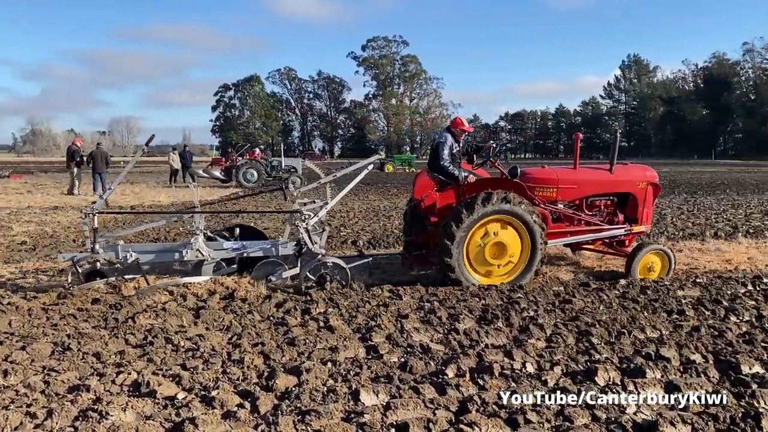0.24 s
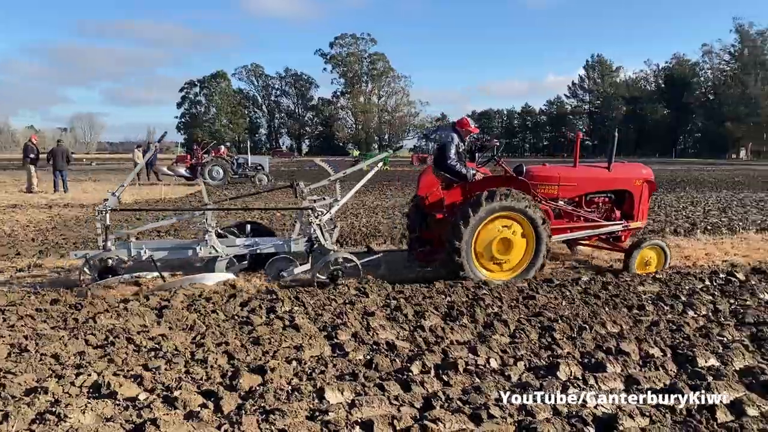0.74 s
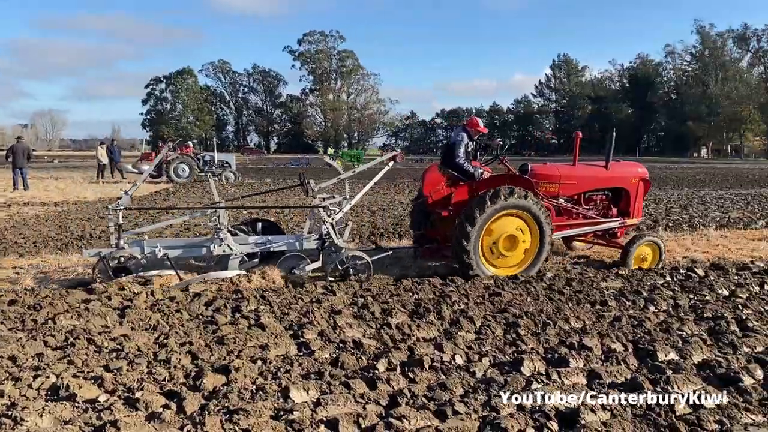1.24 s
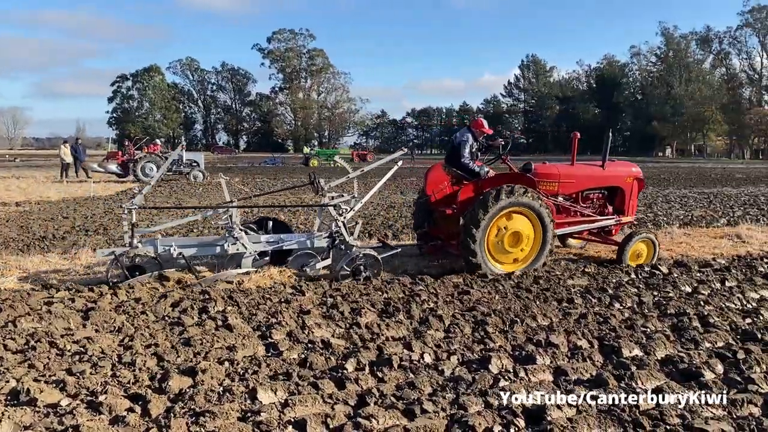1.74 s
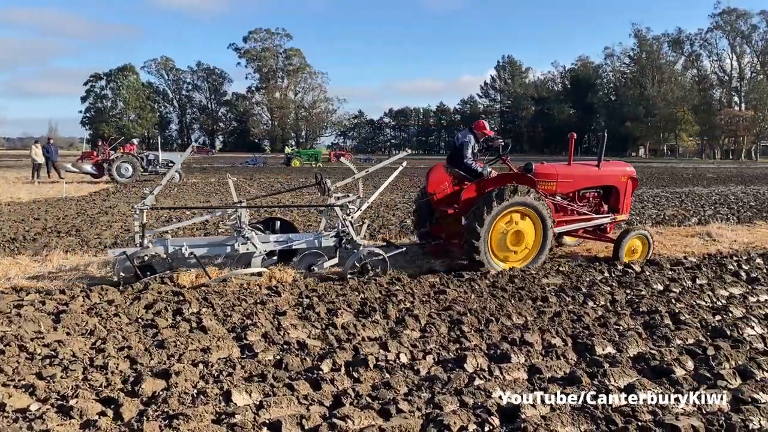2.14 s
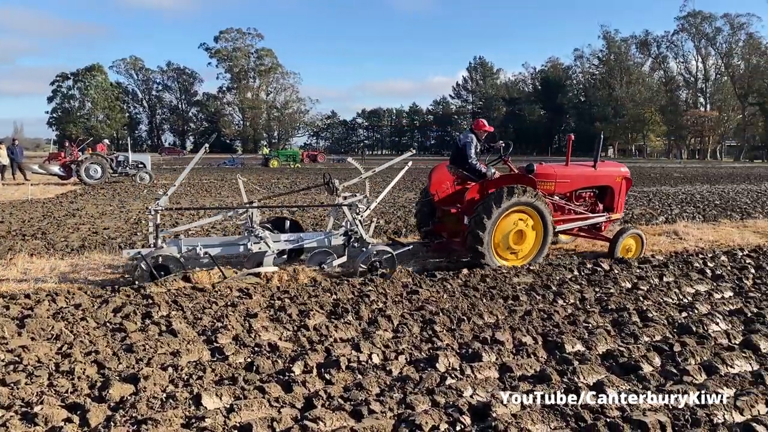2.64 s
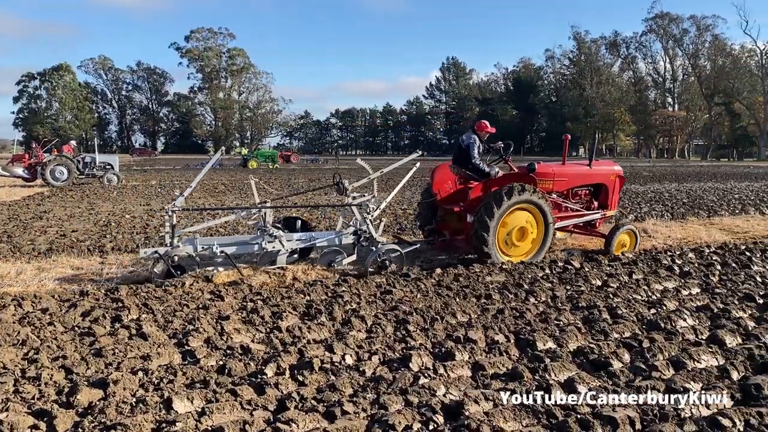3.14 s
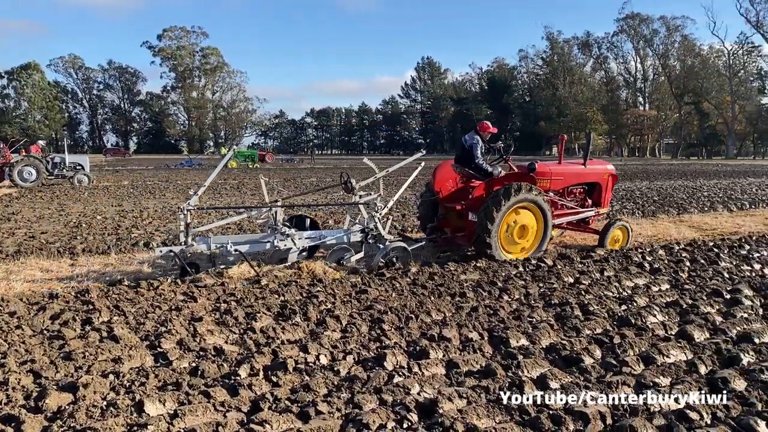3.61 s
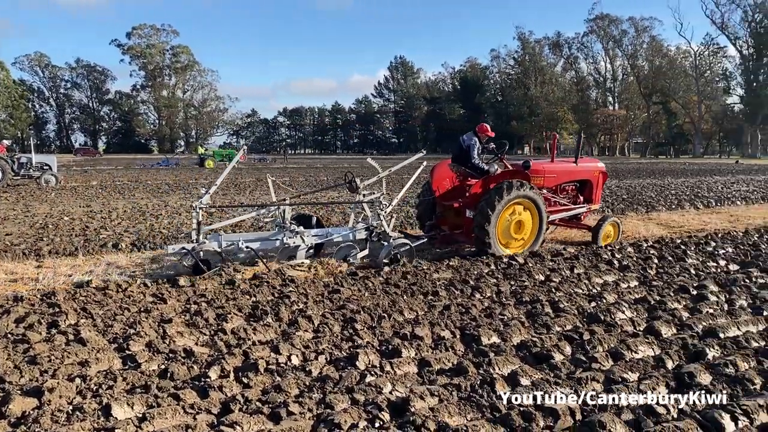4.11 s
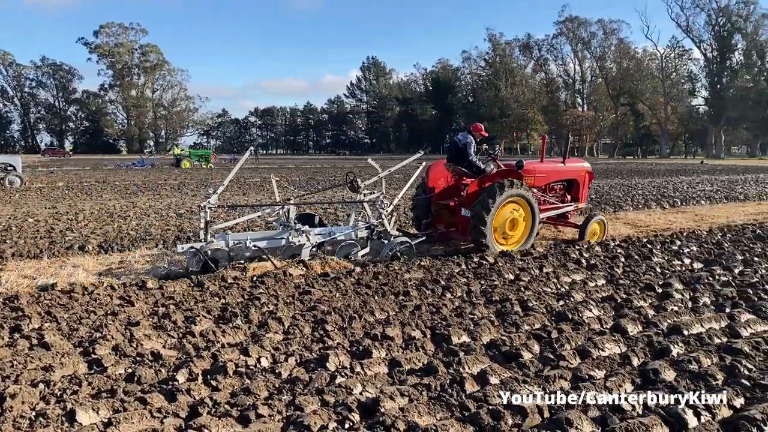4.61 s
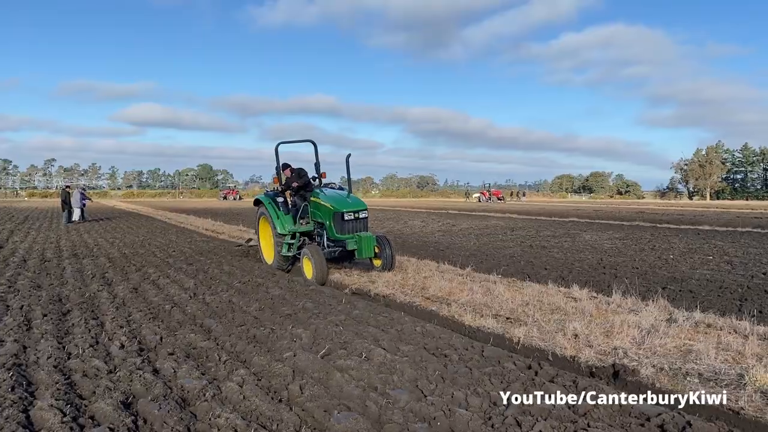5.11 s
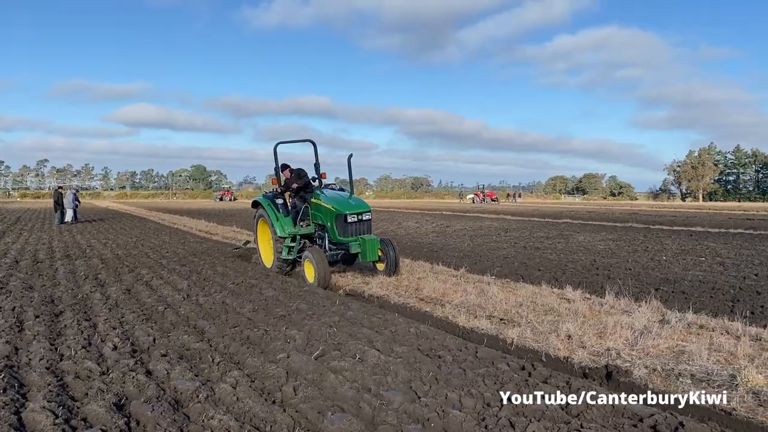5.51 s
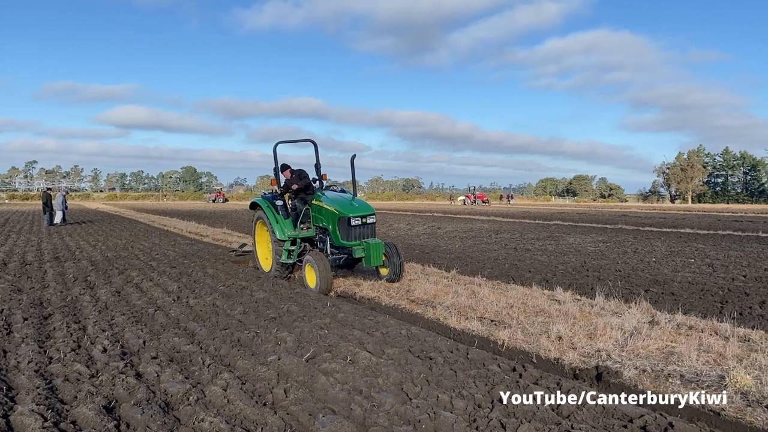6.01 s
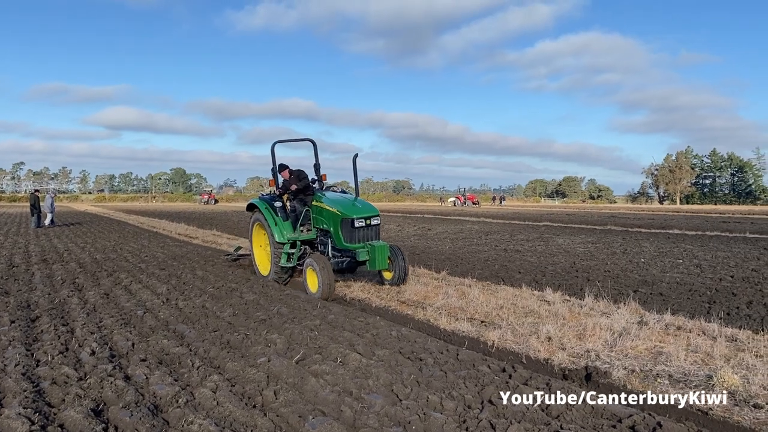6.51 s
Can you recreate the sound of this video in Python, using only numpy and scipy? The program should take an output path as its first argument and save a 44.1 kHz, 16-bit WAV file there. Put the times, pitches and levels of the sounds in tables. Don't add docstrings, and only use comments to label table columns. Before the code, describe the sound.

An old tractor chuffs and clanks rapidly over a deep boom in buffeting wind, then cuts to a smaller diesel's steady tight clatter.

```python
import sys
import numpy as np
from scipy import signal
from scipy.fft import rfft, irfft
from scipy.io import wavfile
from scipy.ndimage import uniform_filter1d

SR = 44100
rng = np.random.default_rng(int(sys.argv[2]) if len(sys.argv) > 2 else 0)


def undo_db(level):
    steps = np.asarray(level, float) / 20
    return 10 ** steps


def generate_wav(sig):
    pcm = np.round(np.clip(np.atleast_2d(sig).T, -1, 1) * 32767).astype(np.int16)
    wavfile.write(sys.argv[1], SR, pcm)


N = 297675
T = np.arange(N) / SR
HZ = np.fft.rfftfreq(N, 1 / SR)
CUT_S = 4.915


def curve(table):
    s, *columns = np.transpose(table)
    return [np.interp(T, s, c) for c in columns]


def unit(x):
    return x / np.sqrt(np.mean(x ** 2))


def walk(rate_hz):
    hold = int(SR / rate_hz)
    steps = np.repeat(rng.standard_normal(N // hold + 1), hold)
    return unit(uniform_filter1d(uniform_filter1d(steps, hold), hold)[:N])


def colour(x, spectrum, rings=()):
    hz, db = np.transpose(spectrum)
    gain_db = np.interp(np.log(HZ + 1), np.log(hz), db)
    for ring_hz, width_hz, ring_db in rings:
        gain_db = gain_db + ring_db / (1 + (2 * (HZ - ring_hz) / width_hz) ** 2)
    return irfft(rfft(x) * undo_db(gain_db), N)


def patchy(spectrum, rings, flicker_db):
    hiss = rfft(colour(rng.standard_normal((2, N)), spectrum, rings))
    out = 0
    for octave in (8, 9.5, 11, 12.5, 14):
        band = np.clip(1 - abs(np.log2(HZ + 1) - octave) / 1.5, 0, 1)
        out = out + irfft(hiss * band, N) * undo_db(flicker_db * walk(12))
    return unit(out)


def ports(pair, table):
    hz, *columns = np.transpose(table)
    lead, lean_db, apart_db = (np.interp(HZ, hz, c) for c in columns)
    side = np.array([[1], [-1]])
    same, apart = rfft(pair)
    both = same * np.exp(.5j * side * lead) + side * apart * undo_db(apart_db)
    return irfft(both * undo_db(side * lean_db / 2), N)


def beat(place, rise, fall):
    p = place % 1
    return (1 - np.exp(-p / rise)) ** 2 * np.exp(-p / fall)


def ring(struck, hz, t60):
    keep, turn = np.exp(-np.log(1000) / (t60 * SR)), 2 * np.pi * hz / SR
    return signal.lfilter([np.sin(turn)], [1, -2 * keep * np.cos(turn), keep ** 2], struck)


# start_s, peak_db, swing_hz, crackle_db (over the swing)
STRONG_EDDIES = [(.054, -15, 150, -9), (.398, -14, 167, -12), (.488, -11, 179, -26), (.54, -10, 151, -30),
                 (.59, -9, 197, -24), (.953, -8, 170, -7), (1.06, -17.5, 211, -10), (1.139, -12, 139, -22),
                 (1.26, -6, 132, -24), (1.35, -12.5, 207, -15), (1.682, -13.5, 221, -20),
                 (1.781, -2, 193, -17.5), (2.312, -15, 235, -15), (2.618, -16, 203, -20),
                 (2.828, -15, 169, -20), (3.051, -14.5, 130, -22), (3.306, -7, 202, -13.5),
                 (3.375, -9.5, 260, -7), (3.443, -8, 168, -6), (3.517, -10.5, 191, -7),
                 (3.736, -13, 200, -4), (3.914, -16, 185, -24), (3.97, -19, 220, 0),
                 (4.274, -17.5, 241, -12), (4.315, -14.5, 166, -12), (4.358, -7, 147, -11),
                 (4.401, -5, 208, -10), (4.696, -7.5, 165, -9.5), (4.843, -17, 215, 1),
                 (4.89, -11.5, 240, -4)]
# start_s, peak_db, swing_hz
LATE_EDDIES = [(5.167, -20.5, 176), (5.26, -23, 148), (5.445, -20, 132), (5.491, -22, 183),
               (5.601, -16, 252), (5.747, -30, 137), (6.126, -18.5, 140), (6.158, -11.5, 132),
               (6.215, -24, 143), (6.274, -20, 221), (6.377, -14, 200), (6.502, -18, 260),
               (6.655, -20, 260), (6.707, -17, 258)]
# start_s, peak_db, swing_hz
SMALL_EDDIES = [(.31, -21, 200), (0.637, -21, 200), (.746, -23, 200), (0.815, -28, 226), (.925, -20, 150),
                (1.09, -21, 204), (1.2, -14, 150), (1.287, -16, 230), (1.38, -36, 200), (1.528, -30, 200),
                (1.841, -18, 200), (1.869, -17.5, 306), (2.016, -22, 190), (2.112, -18, 287),
                (2.25, -20, 199), (2.471, -33, 196.5), (2.689, -22, 200), (2.782, -24, 200),
                (2.852, -19, 200), (2.977, -20, 199), (3.153, -20, 200), (3.54, -20, 260),
                (3.57, -17.5, 240), (3.647, -27, 200), (3.713, -30, 310), (3.75, -16, 200),
                (3.837, -19, 150), (3.93, -21, 200), (4.004, -34, 258), (4.036, -21, 275),
                (4.061, -31, 288), (4.108, -24, 186), (4.13, -18.5, 130), (4.235, -17.5, 140),
                (4.464, -17, 175), (4.507, -34, 200), (4.606, -25, 200), (4.65, -22, 160),
                (4.935, -22, 170), (5.03, -24, 200), (5.129, -35, 170), (5.231, -25, 200),
                (5.282, -25, 330), (5.38, -29, 330), (5.53, -24, 300), (5.662, -21, 170), (5.786, -27, 170),
                (5.813, -27, 170), (6.238, -22, 300), (6.287, -20, 160), (6.311, -22, 170),
                (6.625, -21, 130), (6.41, -27, 170)]


def eddies():
    late = [(*row, -3) for row in LATE_EDDIES]
    small = [(*row, -9) for row in SMALL_EDDIES]
    return [*STRONG_EDDIES, *late, *small]


# freq_hz, level_db (per Hz)
GUST_COLOUR = [(25, -38), (45, -0.5), (75, -2), (130, -4.5), (250, -9), (400, -20.5), (700, -24),
               (1200, -59), (3000, -110)]


def gusts(gust_db, bursts, alike=0.59):
    shared, *own = (undo_db(2.2 * walk(40)) * rng.standard_normal(N) for _ in range(3))
    wake_db, wake_s = -20, .022
    wake = sum(undo_db(db + wake_db) * np.exp(-((T - s) / wake_s) ** 2) for s, db, *_ in bursts)
    strength = undo_db(gust_db + .8 * walk(7.4)) + wake
    return strength * unit(colour(alike * shared + (1 - alike) * np.array(own), GUST_COLOUR))


def wind(gust_db):
    bursts = eddies()
    out = gusts(gust_db, bursts)
    rough = rng.standard_normal((2, N)) + 1.08 * rng.standard_normal(N)
    rough = unit(colour(rough, [(200, -40), (330, 2.5), (500, -6.0), (750, -12.0), (1300, -36), (3000, -90)]))
    snap_hz, snap_s, snap_db = 368, 0.0016, 4.5
    t = np.arange(-400, 1800) / SR
    for (s, db, hz, crackle_db), (first, lean) in zip(bursts, rng.standard_normal((len(bursts), 2))):
        lag = .0005 * first * np.array([1, -1])
        pan_db = 1.5 * lean * np.array([[1], [-1]])
        late = t - .0075 - lag[:, None]
        shape = np.exp(-(late / np.where(late < 0, .003, 1.01 / hz)) ** 2)
        drop = 0.004 * np.exp(-np.maximum(late + 0.0042, 0) / 0.0031)
        swing = np.sin(2 * np.pi * hz * (0.78 * late - drop)) * shape
        at = np.clip(int(s * SR) - 400 + np.arange(len(t)), 0, N - 1)
        crackle = undo_db(crackle_db - 6.5) * rough[:, at] * np.exp(-(late / 0.0062) ** 2)
        snap = undo_db(crackle_db + snap_db) * np.cos(2 * np.pi * snap_hz * late) * np.exp(-(late / snap_s) ** 2)
        out[:, at] += undo_db(db - 2.5 + pan_db / 2) * (swing + crackle + snap)
    return out


# time_s, change_db, fade_s (each way)
DUCKS_AND_SURGES = [(0, -1, .1), (.43, -3, 0.026), (.68, -16, 0.081), (.77, -12, 0.044), (.92, -10, 0.048),
                    (1.03, -8, 0.061), (1.29, -15.5, 0.1), (1.429, -28, 0.026), (1.57, -6, 0.044),
                    (1.65, -12, 0.035), (1.73, 3, 0.034), (2.2, -12, 0.029), (2.29, -5, 0.063),
                    (2.39, -9.5, 0.13), (2.65, -6, 0.2), (2.92, -15.5, 0.046), (3.04, -10, 0.1),
                    (3.5, -3, 0.028), (3.65, -14, 0.075), (3.89, -14, .04), (4.04, -14, 0.038),
                    (4.23, -5, 0.22), (4.44, -13, 0.076), (4.58, -15, 0.049), (4.79, -20, 0.066),
                    (5.15, 13, 0.061), (5.51, 18, 0.076), (5.73, 4, 0.033), (6.3, 3, 0.03), (6.64, 1, .06)]


def guard(boom_db):
    return boom_db + sum(db * np.clip(1 - abs(T - s) / fade, 0, 1) for s, db, fade in DUCKS_AND_SURGES)


# time_s, note_share (0-1)
STACK_SHARE = [(0, 0.85), (.15, 0.8), (1.8, 0.73), (2.4, 0.7), (3.33, 0.7), (3.42, 0.6), (4.85, 0.1),
               (4.95, 0.65), (6.75, 0)]
# multiple (of the firing rate), level_db, phase_rad
STACK_PARTIALS = [
    (2, -1, -3),
    (3, -14.5, 1),
    (4, -25, -0.5),
    (1, -50, 2),
]


def boom(crank, boom_db):
    share = np.clip(curve(STACK_SHARE)[0], 0, 1)
    note = 0
    for multiple, db, rad in STACK_PARTIALS:
        level = undo_db(db + 1.37 * walk(18))
        note = note + level * np.cos(2 * np.pi * multiple * crank + rad + 0.55 * walk(11))
    rumble_colour = [(25, -40), (45, -5.5), (68, -4.5), (90, -2.0), (130, -10.0), (300, -63.5)]
    mid, side = unit(colour(rng.standard_normal((2, N)), rumble_colour))
    apart = 0.31 * side * np.array([[1], [-1]])
    return undo_db(boom_db) * (np.sqrt(2 * share) * note + np.sqrt(1 - share) * mid + apart)


# beat (0-5), pitch_hz, level_db, t60_s
DIESEL_PARTS = [(0, 3213, 3, 0.039), (.03, 2640, -1, 0.091), (0, 1784, 6, 0.07), (0, 2070, -6, 0.028),
                (.12, 1280, -2, 0.06), (0.499, 920, -1, 0.13), (.85, 1657, 5, 0.09), (1.0, 2014, 3, .05),
                (1.02, 2980, 0, 0.017), (1.15, 2620, -3, .04), (1.448, 1390, 1, 0.061),
                (1.949, 2090, 2, 0.072), (2.02, 3200, -0.5, 0.063), (2.1, 1332, 7.5, 0.059),
                (2.052, 1750, 6, .03), (1.8, 700, 0, 0.036), (3.001, 1750, 3, 0.13),
                (3.049, 2010, -1, 0.038), (3.099, 894, 13, 0.026), (4.03, 2970, 1, 0.028),
                (4.2, 743, 1, 0.057), (4.299, 1366, 1, .05)]


def struck_parts(crank):
    out = 0
    for (at, hz, db, t60), luck in zip(DIESEL_PARTS, rng.standard_normal((len(DIESEL_PARTS), N // 2000))):
        blows, = np.nonzero(np.diff(np.floor((crank - at) / 5)))
        struck = np.zeros((2, N))
        struck[0, blows] = undo_db(db + 1.8 * luck[:len(blows)])
        out = out + ring(struck, hz, t60)
    return out / np.sqrt(np.mean(out[0, T > CUT_S] ** 2))


# freq_hz, level_db (per Hz)
CLATTER_COLOUR = [(250, -13), (450, -0.5), (700, -0.5), (1050, -6.5), (1450, -9), (1750, -7.5),
                  (2100, -7.5), (2420, -13.5), (2650, -10.5), (3200, -12.5), (3600, -18.5), (6000, -26),
                  (9000, -26), (12000, -34.5), (16000, -36)]
# pitch_hz, width_hz, boost_db
DIESEL_METAL = [(684, 25, 6), (880, 40, 4), (1209, 14, 9), (1310, 14, 10), (1360, 14, 12), (1528, 14, 9),
                (1607, 14, 7), (1700, 40, 7), (1744, 24, 6), (2029, 20, 5), (2166, 18, 9), (2625, 60, 3.5),
                (3160, 60, 4), (6200, 60, 4), (15340, 200, 7)]
CYCLE_BEATS_DB = [7.5, 7, 7, 0.5, -0.5]
# time_s, level_db
DIESEL_LEVEL = [
    (4.92, -33),
    (5.5, -33),
    (6.1, -32.7),
    (6.75, -32.5),
]
# freq_hz, left_lead_rad, left_over_right_db, unrelated_db
DIESEL_STEREO = [(0, 0, .5, -7), (700, .3, 1, -7), (2400, 1, 1.5, -9), (4400, 1.1, 2.5, -5),
                 (6100, 1.2, 2, -6), (9000, -3.14, 0, -14), (13200, -9.42, 0, -14), (15300, -12.57, 0, -22),
                 (22050, -12.57, 0, -22)]


def diesel(crank):
    memory, steps = .9, 3870
    fresh = rng.standard_normal((2, int(crank[-1] / 5) + 2, steps))
    kept = signal.lfilter([1], [1, -memory], fresh, axis=1).reshape(2, -1)
    knocks = kept[:, (crank / 5 * steps).astype(int)]
    place = crank + .12
    beat_db = np.take(CYCLE_BEATS_DB, place.astype(int) % 5) + 6
    gate = .35 + undo_db(beat_db) * beat(place, .1, .22)
    clatter = unit(colour(gate * knocks, CLATTER_COLOUR, DIESEL_METAL))
    fan = undo_db(-3.5) * patchy(CLATTER_COLOUR, DIESEL_METAL[-2:], 1.2)
    whine = np.sin(2 * np.pi * 16 * crank + 1.4 * walk(9)) * undo_db(-16 + 3 * walk(6.8))
    whine = whine * np.array([[1], [0]])
    near_db, = curve(DIESEL_LEVEL)
    engine = undo_db(-1.0) * clatter + undo_db(-7.5) * struck_parts(crank) + fan + whine
    return ports(undo_db(near_db + 3.0) * engine, DIESEL_STEREO)


# start_s, peak_db, low_ring_hz, high_ring_hz
NEAR_CLANKS = [(0.032, -14, 1570, 2500), (0.0653, -17, 1600, 3360), (0.093, -26, 1140, 2720),
               (0.121, -15.5, 1280, 3680), (0.1484, -16, 1720, 4010), (0.2069, -19, 1600, 3700),
               (0.2324, -23, 1130, 4000), (0.2603, -18.5, 2150, 2670), (0.2894, -23, 1060, 3300),
               (0.3152, -25, 1270, 3810), (0.3421, -25, 1220, 2620), (0.37, -20, 1530, 2620),
               (0.4494, -25, 1110, 3200), (0.4763, -19, 1000, 2580), (0.5038, -29, 1690, 2700),
               (0.5305, -25, 1640, 4170), (0.585, -21, 1250, 2560), (0.61, -27, 1090, 3260),
               (0.6619, -26, 902, 2900), (0.7412, -17, 1030, 2770), (0.7921, -18.5, 1580, 3730),
               (0.8994, -24, 1580, 2410), (0.924, -21, 1450, 2610), (0.953, -18, 1270, 4020),
               (1.1897, -30, 1020, 3570)]
# start_s, peak_db, low_ring_hz, high_ring_hz
FAR_CLANKS = [(1.5153, -24, 1620, 3140), (1.5425, -24, 1180, 3160), (1.71, -32, 1300, 2800),
              (1.7627, -21, 1670, 3160), (1.8785, -18, 1270, 2560), (2.0456, -30, 1280, 3000),
              (2.072, -22, 1080, 3200), (2.1, -32, 920, 2630), (2.1509, -26, 1140, 2790),
              (2.2434, -19, 1060, 3170), (2.3265, -25, 1270, 3150), (2.3863, -27, 1470, 3230),
              (2.4143, -28, 1020, 3950), (2.4701, -26, 1240, 3160), (2.5567, -19, 1600, 3080),
              (2.5864, -23, 1200, 3200), (2.641, -21, 1240, 3190), (2.6692, -18, 1610, 3240),
              (2.6997, -19, 1040, 3250), (2.752, -20, 1280, 3860), (2.7797, -23, 1120, 3280),
              (2.8089, -26, 1640, 2580), (2.8356, -23, 1300, 2420), (3.0268, -27, 1050, 2610),
              (3.053, -24, 1640, 2590), (3.1062, -23, 1350, 3500), (3.214, -23, 1270, 3770),
              (3.2424, -24, 1220, 3460), (3.3229, -20, 1150, 2440), (3.4324, -21, 1170, 3250),
              (3.5397, -20, 1810, 2700), (3.621, -29, 1150, 3200), (3.6494, -24, 1070, 3180),
              (3.839, -21.5, 1320, 2690), (4.0295, -24, 970, 2530), (4.3668, -26, 2060, 3140),
              (4.3938, -24, 1610, 2550), (4.422, -20, 1550, 2600), (4.4801, -29, 980, 3740),
              (4.5354, -21, 966, 3640), (4.6222, -20, 930, 3730), (4.6781, -23, 1350, 3660),
              (4.706, -23, 1630, 3130), (4.734, -22, 1250, 2760), (4.7604, -19, 1130, 2400),
              (4.7909, -17, 1080, 3670), (4.8207, -26, 1120, 2550), (4.846, -28, 1280, 2500),
              (4.9026, -15, 920, 3460)]
# under_peak_db, t60_s
CLANK_DECAYS = [
    (-7, .022),
    (-10.5, .018),
]


def clanks():
    out, t = np.zeros((2, N)), np.arange(1500) / SR
    for s, db, *rings_hz in NEAR_CLANKS + FAR_CLANKS:
        start = int(s * SR)
        for hz, (under_db, t60) in zip(rings_hz, CLANK_DECAYS):
            envelope = (1 - np.exp(-t / 0.0017)) * np.exp(-np.log(1000) * t / t60)
            out[0, start:start + len(t)] += undo_db(db + 4.0 + under_db) * envelope * np.sin(2 * np.pi * hz * t)
    return out


# pitch_hz, level_db, t60_s
BLOCK_MODES = [
    (1125, 6.5, 0.042),
    (1345, 5.5, 0.014),
    (1770, -4, 0.013),
    (2647, -2, 0.043),
    (3610, -2, 0.023),
    (5080, -8.5, 0.018),
    (6200, -22, 0.017),
]


def block_knock(place, firing, chance):
    blows, = np.nonzero(np.diff(np.floor(place - .1)))
    knock = 0
    for k, (hz, db, t60) in enumerate(BLOCK_MODES):
        struck = np.zeros((2, N))
        struck[:, blows] = undo_db(db + 3.0 * chance[firing[blows], 2 + 2 * k:4 + 2 * k].T)
        struck[1, blows] *= np.sign(chance[firing[blows], 1])
        knock = knock + ring(struck, hz, t60)
    return unit(knock)


# freq_hz, level_db (per Hz)
PUFF_COLOUR = [(400, -9), (650, -1), (1000, -4), (1600, -2.5), (2350, -10), (3300, -8), (4500, -12.5),
               (6000, -18), (8000, -16.5), (11000, -20), (16000, -24.5)]
# freq_hz, level_db (per Hz)
TICK_COLOUR = [(400, -10), (1000, 0.5), (2000, 0.5), (3500, -5), (6000, -20), (10000, -24), (16000, -36)]
# freq_hz, level_db (per Hz)
SOIL_COLOUR = [(200, -1), (430, -8), (650, -3), (900, -6), (1300, -6.5), (1800, -13), (2400, -16.5),
               (3200, -15.5), (5500, -27), (8000, -24.5), (16000, -42)]
# pitch_hz, width_hz, boost_db
OLD_METAL = [(639, 48, 5), (1280, 34, 4), (1635, 51, 6.5), (2034, 81, 6.5)]
FIRINGS_DB = [-1.2, -0.34, 1.3, 0.63]
# time_s, level_db
OLD_LEVEL = [(0, -38), (.3, -38), (.75, -38.5), (1.25, -39.5), (2, -40.5), (3, -40), (3.7, -40.5),
             (4.2, -42), (4.6, -42.5), (4.9, -41)]
# freq_hz, left_lead_rad, left_over_right_db, unrelated_db
OLD_STEREO = [(0, 0, -.5, -4), (700, -.1, -.5, -5), (1400, -.3, -.5, -10), (2400, 0, 2, -10),
              (4400, -.5, 5, -6), (5500, .2, 3, -1), (6500, .7, 1, -6), (9100, -3.14, 0, -11),
              (13400, -9.42, 0, -11), (15500, -12.57, 0, -20), (22050, -12.57, 0, -20)]


def old_tractor(crank):
    place = crank + .25
    firing = np.floor(place).astype(int) + 4
    chance = rng.standard_normal((N // 500, 2 + 2 * len(BLOCK_MODES)))
    hard_db = np.zeros(len(chance))
    hard = [firing[int((s + .004) * SR)] for s, *_ in NEAR_CLANKS + FAR_CLANKS]
    hard_db[hard] = 3.3
    puff = undo_db(hard_db + 1.2 * chance[:, 0] + np.resize(FIRINGS_DB, len(chance)))[firing]
    tick = undo_db(-8.5 + 3.5 * chance[:, 1])[firing]
    gas = rng.standard_normal((2, N))
    puffs = colour(puff * beat(place, 0.037, 0.21) * gas, PUFF_COLOUR, OLD_METAL)
    ticks = colour(tick * beat(place - .55, 0.069, .15) * gas, TICK_COLOUR, OLD_METAL)
    engine = undo_db(1.8) * unit(puffs + ticks) + undo_db(-6) * block_knock(place, firing, chance)
    soil = undo_db(3.0) * patchy(SOIL_COLOUR, OLD_METAL, 0.9)
    near_db, = curve(OLD_LEVEL)
    return ports(undo_db(near_db) * (engine + soil) + clanks(), OLD_STEREO)


# time_s, rate_hz
OLD_SPEED = [(0.0, 34.42), (0.327, 36.72), (0.655, 38.21), (0.982, 37.72), (1.309, 37.06), (1.637, 36.21),
             (1.964, 35.81), (2.291, 34.98), (2.619, 35.51), (2.946, 36.74), (3.273, 37.11), (3.601, 36.52),
             (3.928, 37.1), (4.255, 35.1), (4.583, 35.6), (4.91, 35.21)]
# time_s, rate_hz
DIESEL_SPEED = [(4.92, 57.06), (5.527, 56.98), (6.133, 56.78), (6.74, 57.26)]
# time_s, boom_db (bass past the guard), gust_db
WIND_LEVEL = [(0, -22.5, -27), (.34, -16, -32.5), (.7, -16, -27), (.9, -17, -29.5), (1.1, -15.5, -26.5),
              (1.78, -17.5, -28.5), (1.84, -34.5, -31), (2.07, -22.5, -41.5), (2.5, -17.5, -33.5),
              (2.87, -14, -30), (3.02, -16, -34), (3.3, -16, -28), (3.4, -26.5, -34), (3.8, -26, -29),
              (4.4, -22, -30), (4.91, -22.5, -27.5), (5.09, -40, -32), (5.7, -34, -30),
              (5.97, -34.5, -36.5), (6.75, -29.5, -29.5)]


def scene():
    old_crank = -.43 + np.cumsum(curve(OLD_SPEED)[0]) / SR
    diesel_crank = .07 + np.cumsum(curve(DIESEL_SPEED)[0] * (T > CUT_S)) / SR + 200
    boom_db, gust_db = curve(WIND_LEVEL)
    first = np.clip((CUT_S - T) / .004 + .5, 0, 1)
    engines = first * old_tractor(old_crank) + (1 - first) * diesel(diesel_crank)
    gust_db = gust_db + 0.42 * guard(0)
    return engines + boom(old_crank, guard(boom_db)) + wind(gust_db)


def roll_off(x):
    return signal.sosfilt(signal.butter(12, 16970, fs=SR, output="sos"), x)


# start_s, end_s, low_hz, high_hz, spare (0-3)
SILENT_SUM_BANDS = [
    (0, 2.3, 8350, 9750, 1.0),
    (0, 2.3, 12800, 13900, .8),
    (2.3, 4.92, 8350, 9750, .4),
    (2.3, 4.92, 12800, 13900, .3),
    (4.92, 6.75, 8350, 9700, 1.4),
    (4.92, 6.75, 12500, 13900, 3),
]


def record(dry):
    low_cut = signal.butter(2, 36, "high", fs=SR, output="sos")
    trimmed = signal.sosfilt(low_cut, np.tanh(1.199 * dry) / 1.03)
    trimmed = irfft(rfft(trimmed) * (HZ < 15880), N)
    both = rfft(trimmed.mean(axis=0))
    for start, end, low_hz, high_hz, spare in SILENT_SUM_BANDS:
        edges, opens = np.linspace(low_hz, high_hz, 5), walk(43)
        for low, high, less in zip(edges, edges[1:], (.9, 0, 0, .9)):
            silent = .8 * opens + .6 * walk(43) < spare + .15 - less
            dropped = (T >= start) * (T < end) * silent
            band = irfft(both * (HZ > low) * (HZ <= high), N)
            trimmed = trimmed - uniform_filter1d(1. * dropped, size=300) * band
    return roll_off(trimmed)


dry = scene()
out = record(dry)
generate_wav(out)
```